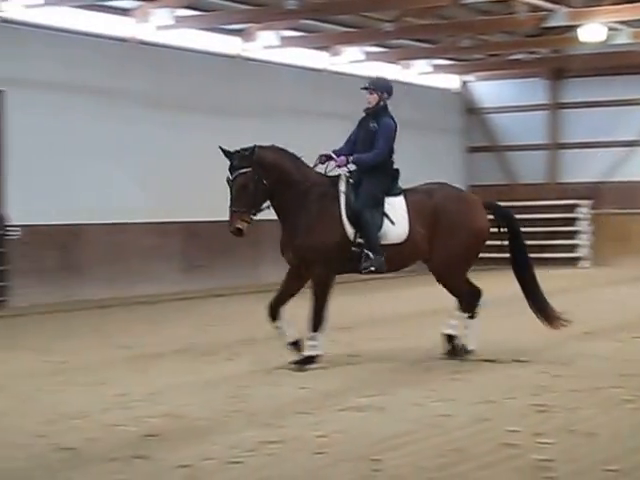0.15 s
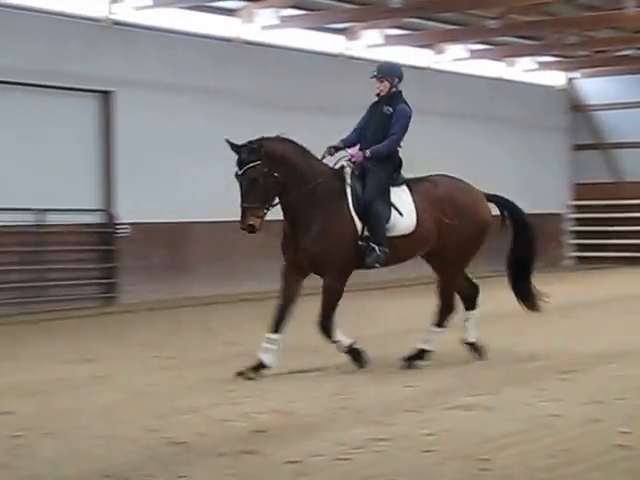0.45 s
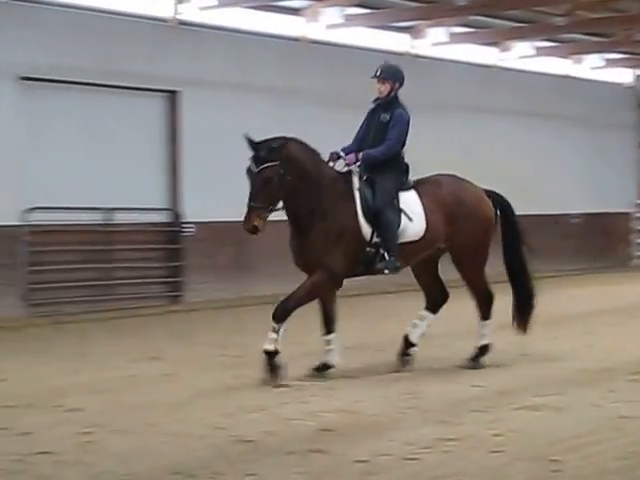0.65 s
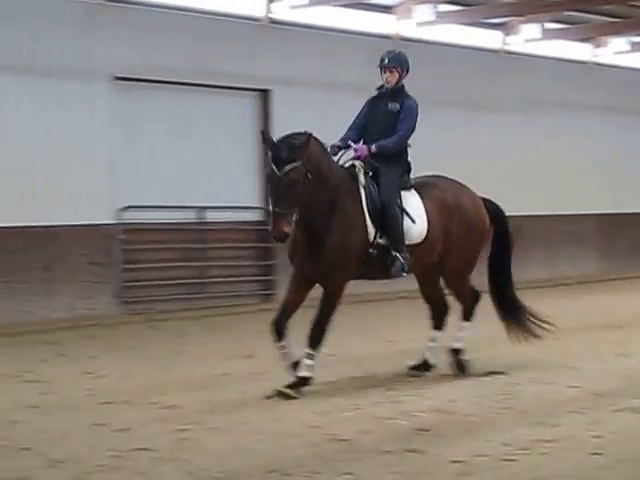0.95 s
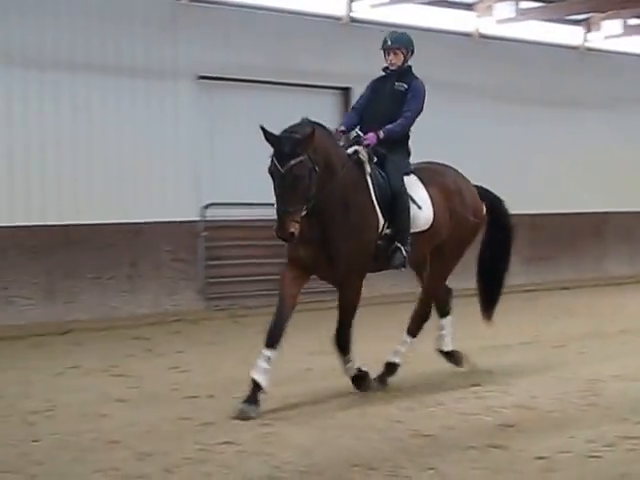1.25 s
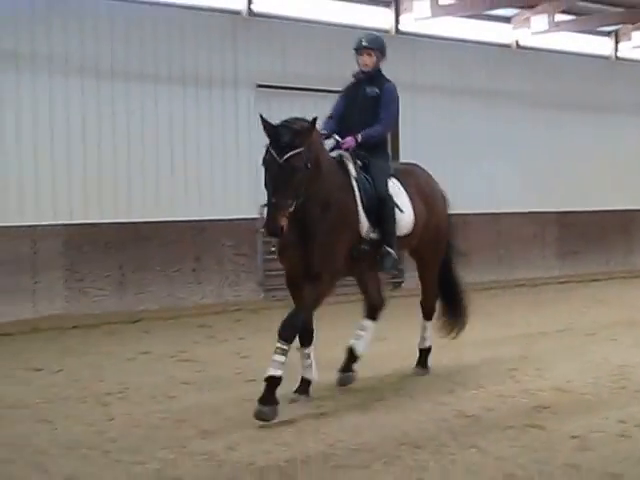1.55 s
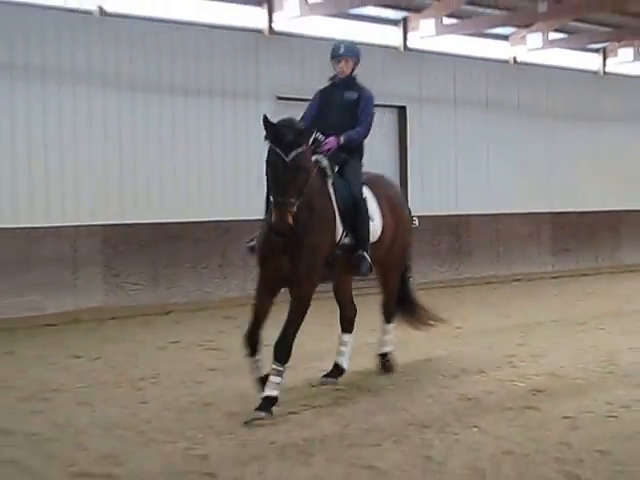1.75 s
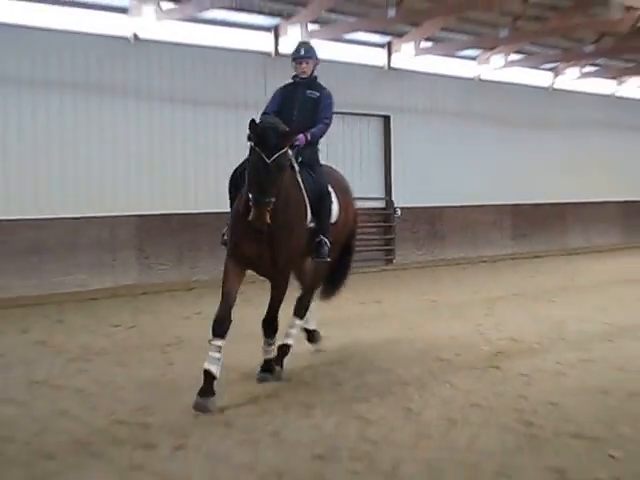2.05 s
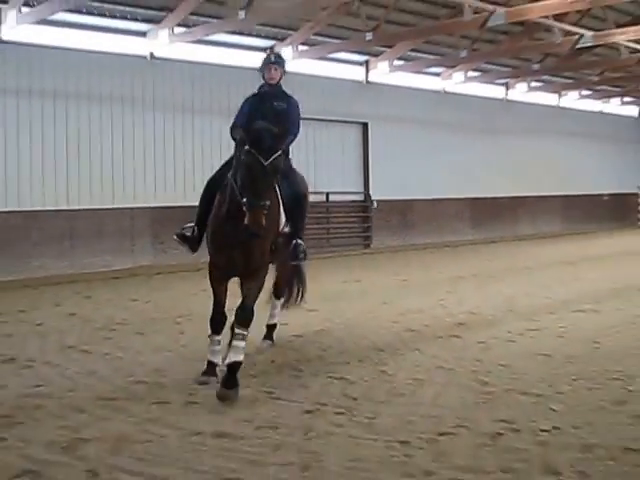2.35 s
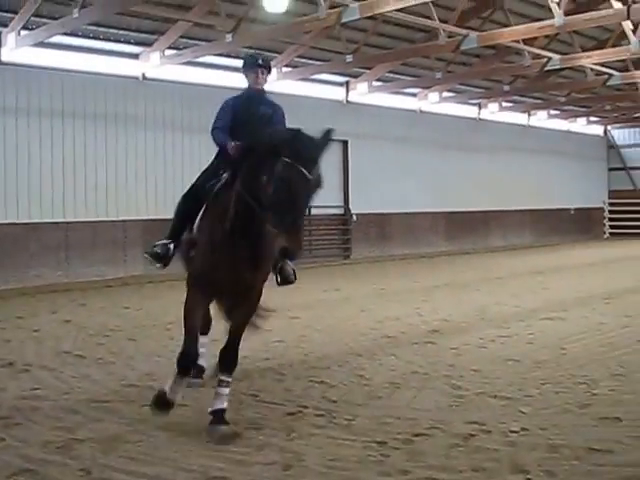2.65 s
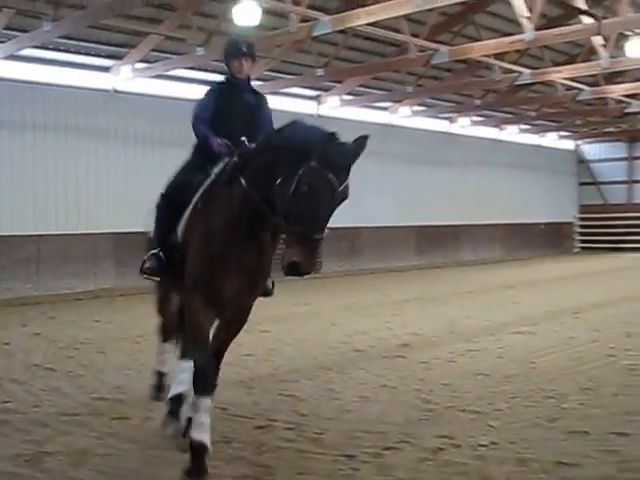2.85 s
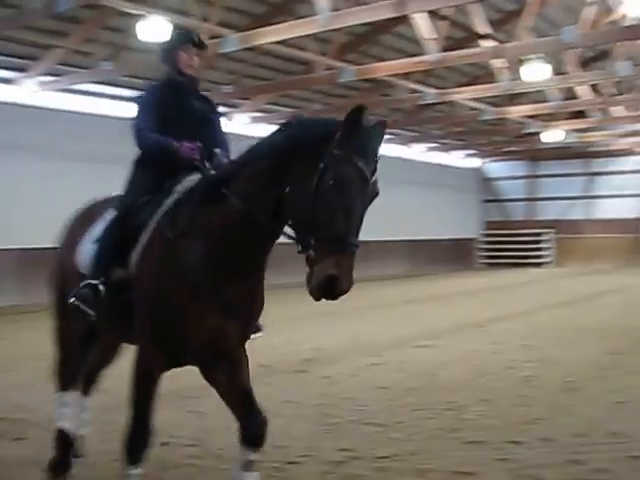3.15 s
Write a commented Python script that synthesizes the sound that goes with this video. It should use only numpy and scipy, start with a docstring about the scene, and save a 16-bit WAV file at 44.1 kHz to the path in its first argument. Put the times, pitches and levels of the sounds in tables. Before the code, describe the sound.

A horse trots nearer on sand, soft hoof thuds and gritty sprays, one hollow knock near the end

```python
"""Horse trotting in an indoor arena

A ridden horse trots toward the microphone on sand, a step about every .42 s: its hooves scuff, thud and pat
(shaped noise) and throw sprays of sand with clods (dense random grains) and grit (one-cycle ticks).
Close by, one hoof clips another with a hollow knock (decaying modes of the horn); the tack creaks faintly
(resonant noise), and the hall adds a dull diffuse tail and a low hush."""
import sys
import numpy as np
from scipy import signal
from scipy.fft import rfft, irfft
from scipy.io import wavfile
from scipy.ndimage import uniform_filter1d

SR = 44100
rng = np.random.default_rng(int(sys.argv[2]) if len(sys.argv) > 2 else 0)


def transcribe(u):
    """Save the signal u as a 16-bit wav file named by the first command-line argument.

    u: samples, shape (n,) or (channels, n), limited to [-1, 1]; the rate is SR.
    q: integer samples, one column per channel.
    """
    v = np.clip(np.atleast_2d(u).T, -1, 1)
    q = np.round(v * 32767).astype(np.int16)
    wavfile.write(sys.argv[1], SR, q)


N = 145530  # length in samples

# stereo width of noise and tail: f/Hz, side minus mid/dB
STEREO_WIDTH = [(100, -25.5), (380, -18), (700, -11), (2380, -3.5), (15000, 0)]
# spectrum of rubbing, also of creaks and knock noise: f/Hz, relative level per Hz/dB
RUB_COLOUR = [(80, -15), (250, -0.5), (500, 0.5), (800, 6.5), (4000, -3), (8000, -11.5), (16000, -27)]
# spectrum of flying and breaking sand: f/Hz, relative level per Hz/dB
SAND_SPECTRUM = [(25, -67), (700, -19), (1500, -9.5), (3000, 0.5), (4800, 1), (11000, -2.5), (16000, -14.5)]


def gain_of(db):
    """Decibels to gain."""
    return 10 ** (np.asarray(db) / 20)


def read(points, hz):
    """Reads a table on a log-frequency axis."""
    f, value = np.transpose(points)
    return np.interp(np.log(hz + 1), np.log(f + 1), value)


def add(mix, s, sound):
    """Mixes a sound in at time s, cut off at both ends of the mix."""
    at = round(s * SR)
    sound = sound[:, max(-at, 0):]
    part = mix[:, max(at, 0):][:, :sound.shape[1]]
    part += sound[:, :part.shape[1]]


def coloured(pair, colour, tilt_db=0):
    """Gives two random signals a spectrum, a tilt in dB per octave and the stereo width, at rms 1."""
    hz = np.fft.rfftfreq(pair.shape[1], 1 / SR)
    spectrum_db = read(colour, hz) + tilt_db * np.log2((hz + 50) / 1000)
    mid, side = rfft(pair) * gain_of(spectrum_db)
    side = side * gain_of(read(STEREO_WIDTH, hz))
    x = irfft(np.array([mid + side, mid - side]))
    return x / np.sqrt(np.mean(x ** 2) + 1e-20)


def envelope(rise, hold, fade, size):
    """Linear attack, and exponential release from time hold on; all times in s."""
    t = np.arange(size) / SR
    release = np.exp(-np.maximum(t - hold, 0) / fade)
    return np.minimum(t / rise, 1) * release


def shaped(x, shape):
    """Lays an envelope on a random signal, at rms 1 under its top."""
    y = x * shape
    return y * np.sqrt(np.mean(shape ** 2) / np.mean(y ** 2))


def grains(size):
    """Dense random impacts of sand grains, a few of them large."""
    grains_per_s, spread_db = 13000, 2
    strength = gain_of(spread_db * np.minimum(rng.exponential(1, size), 5))
    hits = rng.random(size) < grains_per_s / SR
    return rng.standard_normal((2, size)) * strength * hits


def clumps(depth_db, size, count=300):
    """Uneven flow of sand: a randomly wandering gain, smoothed over count samples."""
    wander = uniform_filter1d(rng.standard_normal(size), count)
    return gain_of(depth_db * wander / wander.std())


def patchy(x):
    """Falling sand changes colour from moment to moment: random gains, smooth in time and frequency."""
    depth_db = 2.0
    z = signal.stft(x, nperseg=256)[2]
    across_hz = uniform_filter1d(rng.standard_normal(z.shape[1:]), size=6, axis=0)
    patches = uniform_filter1d(across_hz, size=4, axis=1)
    z = z * gain_of(depth_db * patches / patches.std())
    return signal.istft(z, nperseg=256)[1][:, :x.shape[1]]


def hush():
    """Low, steady background of the hall: stationary noise, strongest in the bass."""
    level_db = -57
    # spectrum of the empty hall: f/Hz, relative level per Hz/dB
    hush_colour = [(20, -22), (45, -10), (85, -1), (140, 0), (1500, -5.5), (4000, -10.5), (16000, -27)]
    return coloured(rng.standard_normal((2, N)), hush_colour) * gain_of(level_db)


def hall(x):
    """Diffuse tail of the arena: noise decaying by frequency band, the treble dying first."""
    build_up_s = 0.014
    # reverberation of the arena: f/Hz, time to fall by 60 dB/s
    decay_times = [(2000, 1), (6000, 0.84), (15000, 0.65)]
    hz, t, z = signal.stft(rng.standard_normal((2, SR)), SR, nperseg=256)
    decay = gain_of(-60 * t / read(decay_times, hz)[:, None])
    z = z * decay * np.minimum(t / build_up_s, 1)
    tail = signal.istft(z, SR, nperseg=256)[1]
    tail = tail / np.linalg.norm(tail[0])
    mid, side = signal.fftconvolve(x.mean(0)[None], tail, axes=1)[:, :N]
    width = gain_of(read(STEREO_WIDTH, np.fft.rfftfreq(N, 1 / SR)))
    side = irfft(rfft(side) * width, N)
    return np.array([mid + side, mid - side])


def creaks():
    """Leather of the tack rubs: noise excites a narrow, fuzzy resonance."""
    length_s, width_hz = .06, 61
    # faint creaks of the tack: t/s, f/Hz, level/dB
    creak_table = [(1.634, 1180, -55.5), (1.712, 1250, -55)]
    out = np.zeros((2, N))
    t = np.arange(0, length_s, 1 / SR)
    swell = np.sin(np.pi * t / length_s)
    radius = np.exp(-np.pi * width_hz / SR)
    for s, hz, db in creak_table:
        pole = radius * np.exp(2j * np.pi * hz / SR)
        ring = signal.lfilter([1], [1, -pole], rng.standard_normal((2, len(t)))).real
        add(out, s, gain_of(db) * coloured(ring, RUB_COLOUR) * swell)
    return out


def scuffs(size=24000):
    """Hooves drag through the footing: rubbing noise with an uneven flow."""
    rise_s, fade_s, clump_db = 0.0072, 0.028, 2.27
    # hooves dragging: t/s, time until the fade/s, level/dB
    scuff_table = [(-.02, 0.12, -62.5), (0.112, 0.12, -61), (0.406, .18, -57), (0.858, 0.15, -57),
                   (1.234, 0.15, -55), (1.344, 0.23, -57), (1.639, 0.28, -58.5), (1.87, 0.19, -56),
                   (2.069, 0.14, -50.5), (2.17, 0.23, -55), (2.517, 0.15, -53), (2.766, 0.11, -58),
                   (2.88, 0.15, -52.5), (3.118, 0.16, -56)]
    out = np.zeros((2, N))
    for s, length, db in scuff_table:
        rub = coloured(rng.standard_normal((2, size)), RUB_COLOUR) * clumps(clump_db, size, count=500)
        add(out, s, gain_of(db) * rub * envelope(rise_s, length, fade_s, size))
    return out


def thuds(size=24000):
    """Weight presses the sand down: a soft, low burst of noise that crumbles slightly."""
    rise_s, hold_s, fade_s, crumble_db = 0.0029, 0.0086, 0.081, 0.5
    # weight landing: t/s, level/dB, tilt/dB per octave
    thud_table = [(0.051, -62, -20), (.144, -53.5, 8), (.175, -52.5, -6.5), (.44, -59, 1), (.69, -65.5, 0),
                  (1.025, -60, -10), (1.318, -58.5, -9), (1.36, -53, -1), (1.412, -52.5, -5.5),
                  (1.71, -56.5, -10), (1.765, -56.5, -5), (2.145, -55.5, -5), (2.585, -55, -2),
                  (2.625, -53, -1), (3.015, -55, -3)]
    # spectrum of a thud before its tilt: f/Hz, relative level per Hz/dB
    thud_spectrum = [(30, -40), (90, -8.5), (130, 1.5), (420, 1), (800, -10.5), (1500, -56), (5000, -71)]
    out = np.zeros((2, N))
    shape = envelope(rise_s, hold_s, fade_s, size)
    for s, db, tilt_db in thud_table:
        push = coloured(rng.standard_normal((2, size)), thud_spectrum, tilt_db) * clumps(crumble_db, size)
        add(out, s, gain_of(db) * shaped(push, shape))
    return out


def pats(size=4096):
    """A toe or heel meets packed footing: a short, dull pat in one broad band."""
    rise_s, hold_s, fade_s = 0.0017, 0.0031, 0.0063
    narrow_db = 34  # dB per squared octave
    # toes and heels patting: t/s, level/dB, f/Hz
    pat_table = [(.144, -51, 304), (.163, -47.5, 397), (.405, -56, 800), (.863, -55, 560),
                 (1.249, -50, 560), (1.36, -48, 344), (2.154, -49, 155), (2.532, -42.5, 1370),
                 (2.56, -48, 615), (2.623, -47.5, 250), (2.657, -49, 366), (2.816, -43.5, 1760),
                 (3.129, -38.5, 2590)]
    out = np.zeros((2, N))
    hz = np.fft.rfftfreq(size, 1 / SR)
    shape = envelope(rise_s, hold_s, fade_s, size)
    for s, db, centre_hz in pat_table:
        band_db = -narrow_db * np.log2((hz + 1) / centre_hz) ** 2
        pat = coloured(rng.standard_normal((2, size)), np.column_stack([hz, band_db]))
        add(out, s, gain_of(db) * shaped(pat, shape))
    return out


def sprays(size=20000):
    """Kicked sand rains down in clumps of grains."""
    rise_s, fade_s, clump_db = 0.0023, 0.043, 1.4
    # thrown sand falling back: t/s, time until the fade/s, level/dB, tilt/dB per octave
    spray_table = [(0.105, 0.073, -53, -3), (.244, 0.04, -51.5, -0.5), (0.497, 0.15, -50.5, -4),
                   (0.55, 0.068, -56.5, -5), (0.642, 0.044, -45.5, -3.5), (0.948, 0.17, -52, -2.5),
                   (1.076, 0.049, -47.5, -4), (1.356, 0.11, -50, -2.5), (1.474, 0.063, -49, -1.5),
                   (1.771, 0.057, -50.5, -2.5), (1.873, 0.11, -48.5, -1.5), (2.179, 0.14, -49.5, -3.5),
                   (2.322, 0.025, -41, -2.5), (2.623, 0.088, -47, -1), (2.748, 0.077, -47.5, -1.5),
                   (2.923, 0.041, -49.5, -5.5), (3.044, 0.039, -47, -4), (3.127, 0.025, -41, 0),
                   (3.159, 0.051, -48, 0)]
    out = np.zeros((2, N))
    for s, length, db, tilt_db in spray_table:
        sand = patchy(coloured(grains(size), SAND_SPECTRUM, tilt_db)) * clumps(clump_db, size)
        add(out, s, gain_of(db) * sand * envelope(rise_s, length, fade_s, size))
    return out


def clods(size=2048):
    """Lumps of sand break: short, uneven crunches of grains."""
    rise_s, hold_s, fade_s, clump_db = 0.00025, 0.0016, 0.0041, 0.5
    # clods bursting: t/s, level/dB, tilt/dB per octave
    clod_table = [(0.1088, -45, 0), (0.246, -42.5, -0.5), (0.503, -47, 7), (.552, -43.5, -5),
                  (0.6464, -44, -2), (.948, -42, 3.5), (1.361, -38, 1), (1.5004, -34.5, 1.5),
                  (1.5189, -38, -1.5), (1.772, -43.5, -1), (1.883, -35, 7), (1.937, -36, 4.5),
                  (1.9588, -36.5, -1.5), (2.1817, -39.5, 4), (2.256, -40, -6), (2.3241, -31.5, 14),
                  (2.6226, -38, 0), (2.654, -43, 6), (2.7113, -36, 1.5), (2.736, -40, -5.5),
                  (2.776, -31, 5.5), (2.946, -42.5, -5.5), (3.0221, -31.5, 1), (3.13, -41, -6),
                  (3.1443, -32.5, 8), (3.1795, -27.5, 1.5), (3.242, -44.5, -5)]
    out = np.zeros((2, N))
    shape = envelope(rise_s, hold_s, fade_s, size)
    for s, db, tilt_db in clod_table:
        crunch = coloured(grains(size), SAND_SPECTRUM, tilt_db) * clumps(clump_db, size, count=30)
        add(out, s, gain_of(db) * shaped(crunch, shape))
    return out


def grit(size=128):
    """Bits of grit snap in ticks of about one cycle; faint stray ones grow as the horse nears."""
    tick_hz, right_lag_s = 9600, .000018
    strays_per_s, stray_db, growth_db_per_s, spread_db = 27, -55, 5.5, 1.5
    # single bits of grit snapping: t/s, level/dB
    grit_table = [(1.3635, -19.5), (1.502, -15), (1.872, -22.5), (2.326, -13.5), (2.7769, -15),
                  (3.1803, -6)]
    out = np.zeros((2, N))
    t = (np.arange(size) - size / 2) / SR - np.array([[0], [right_lag_s]])
    u = (np.pi * tick_hz * t) ** 2
    tick = (1 - 2 * u) * np.exp(-u)
    for s, db in grit_table:
        add(out, s - size / 2 / SR, gain_of(db) * tick)
    nearing_db = stray_db + growth_db_per_s * np.arange(N) / SR
    strength = gain_of(nearing_db + spread_db * np.minimum(rng.exponential(1, N), 4))
    strays = strength * (rng.random(N) < strays_per_s / SR)
    return out + signal.oaconvolve(strays[None], tick, axes=1)[:, :N]


def knocks(size=4000):
    """Hoof horn cracks and rings in modes, reaching the right side first; legs and ground scatter it."""
    left_lag_s, rise_s = 0.00026, 0.00075
    crack_db, crack_fade_s, crack_tilt_db = -12, 0.0026, 1.7
    scatter_db, scatter_fade_s = -15.5, 0.0055
    # hoof on hoof: t/s, level/dB, f driven most/Hz, narrowness of the drive/dB per squared octave
    knock_table = [(2.9762, -17, 1500, -1), (2.9791, -19, 1200, 22)]
    # modes of the hoof horn: f/Hz, level/dB, time to fall by 60 dB/s, left minus right/dB
    horn_modes = [(640, -7, 0.025, -4.5), (992, 1.5, 0.013, -5.5), (1174, 1, 0.037, 3.5),
                  (1463, -2.5, 0.033, -3), (1983, -8, 0.033, -8.5), (2682, -1, 0.014, -13.5)]
    out = np.zeros((2, N))
    t = np.maximum(np.arange(size) / SR - np.array([[left_lag_s], [0]]), 0)
    onset = np.minimum(t / rise_s, 1)
    for s, level_db, centre_hz, narrow_db in knock_table:
        noise = coloured(rng.standard_normal((2, size)), RUB_COLOUR, crack_tilt_db)
        crack = noise * onset * np.exp(-t / crack_fade_s)
        # a contact that drives a narrower band also cracks less
        add(out, s, gain_of(level_db + crack_db - narrow_db) * crack)
        for k, (hz, db, t60, pan_db) in enumerate(horn_modes):
            drive_db = level_db + db - narrow_db * np.log2(hz / centre_hz) ** 2
            ring_db = drive_db + pan_db * np.array([[.5], [-.5]]) - 60 * t / t60
            sign = (-1) ** k  # neighbouring modes start in opposite directions
            add(out, s, sign * gain_of(ring_db) * np.sin(2 * np.pi * hz * t) * onset)
    scatter = coloured(rng.standard_normal((2, size)), RUB_COLOUR) * t * np.exp(-t / scatter_fade_s)
    scatter /= abs(rfft(scatter)).max()
    return out + gain_of(scatter_db) * signal.oaconvolve(out, scatter, axes=1)[:, :N]


def scene():
    """Steps, creaks, grit and knocks over the hush; all but the grit feed the hall."""
    steps_to_hall_db, knocks_to_hall_db = -11.5, -26
    steps = creaks() + scuffs() + thuds() + pats() + sprays() + clods()
    horn = knocks()
    tail = hall(gain_of(steps_to_hall_db) * steps + gain_of(knocks_to_hall_db) * horn)
    return hush() + tail + steps + grit() + horn


def record(dry):
    """The band limit of the camera that picks up the sound: a steep linear-phase low-pass."""
    edge_hz = 16100
    low_pass = signal.firwin(511, edge_hz, window=("kaiser", 9), fs=SR)
    return signal.oaconvolve(dry, low_pass[None], "same")


dry = scene()
out = record(dry)
transcribe(out)
```